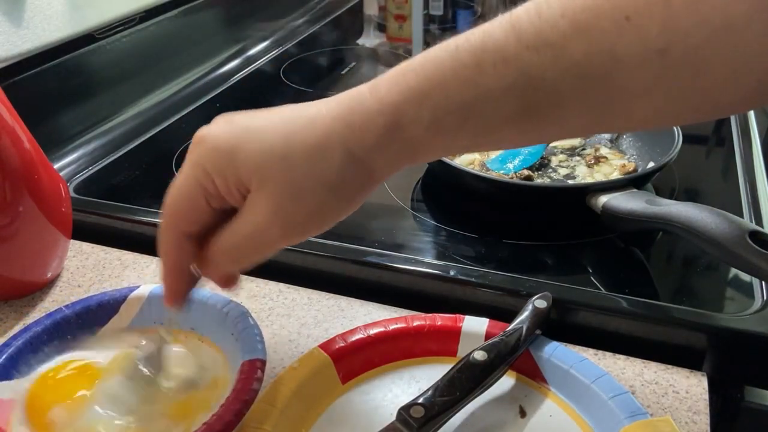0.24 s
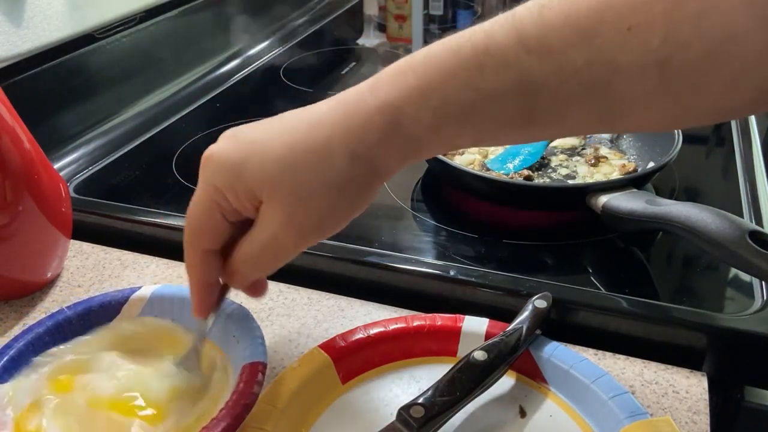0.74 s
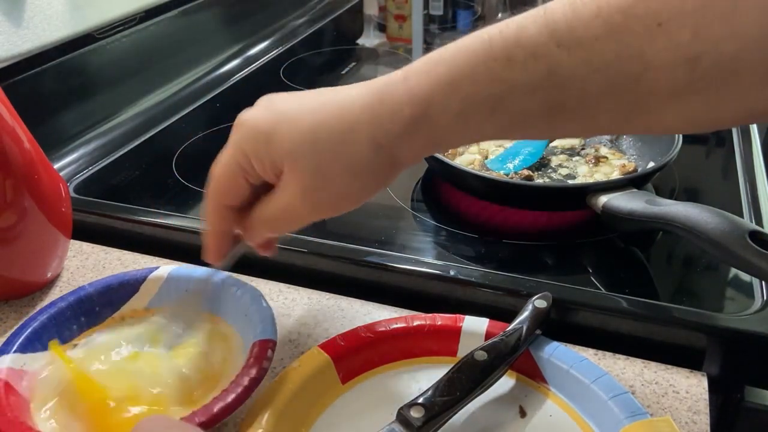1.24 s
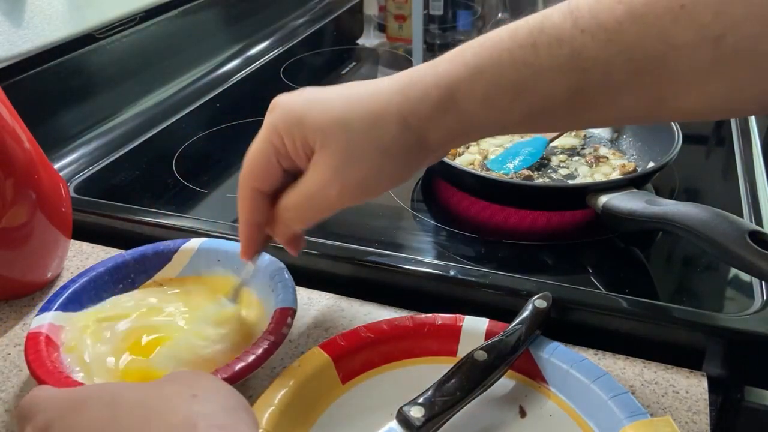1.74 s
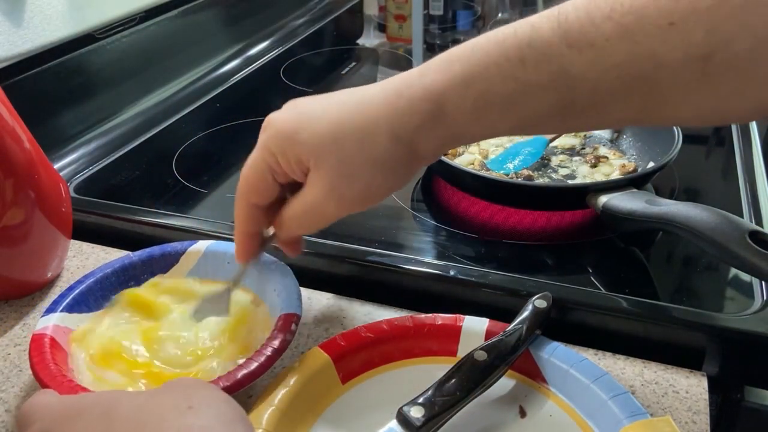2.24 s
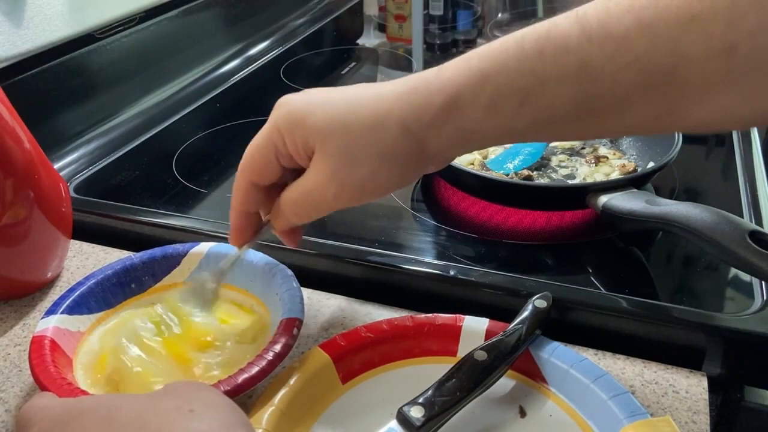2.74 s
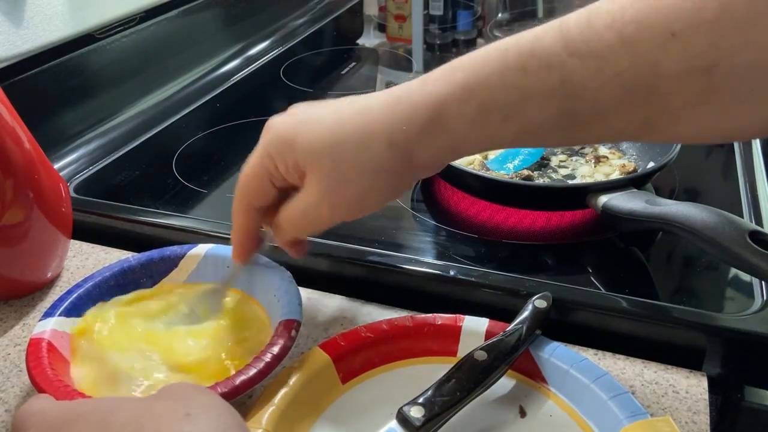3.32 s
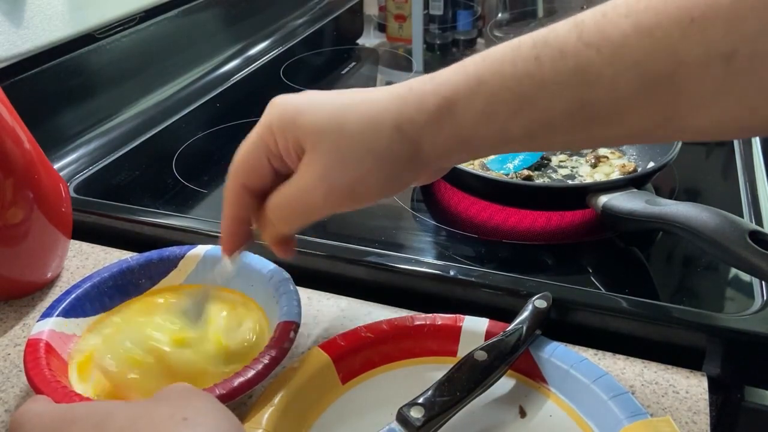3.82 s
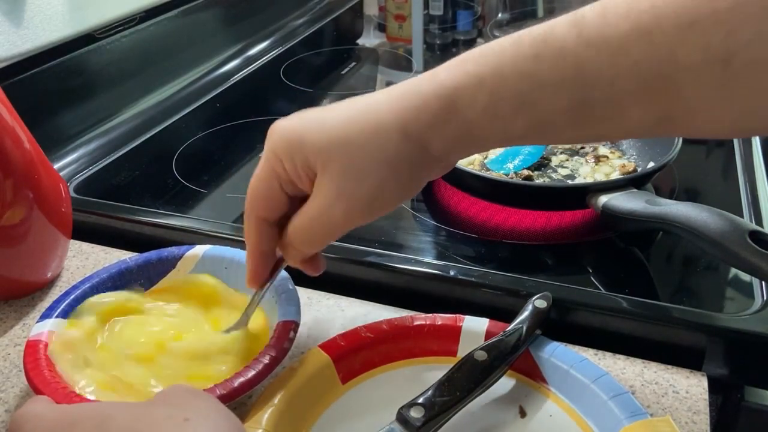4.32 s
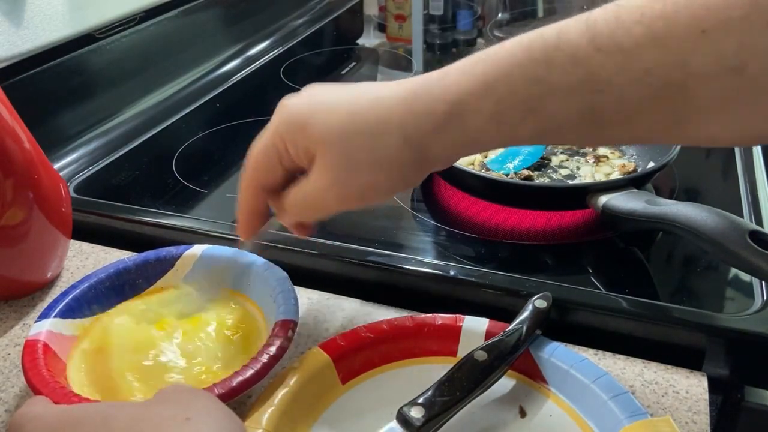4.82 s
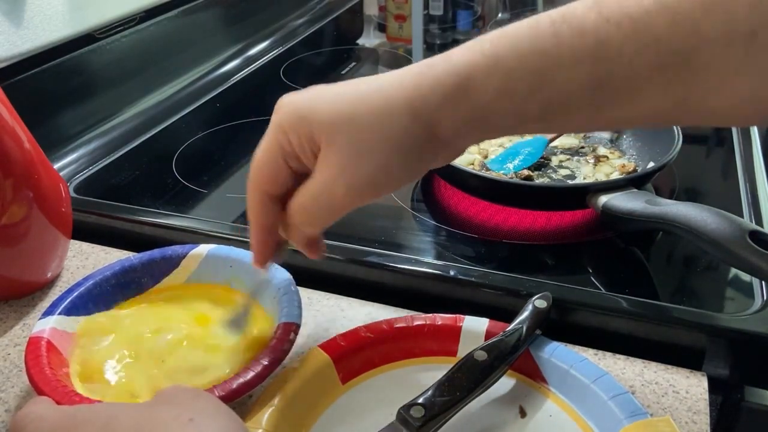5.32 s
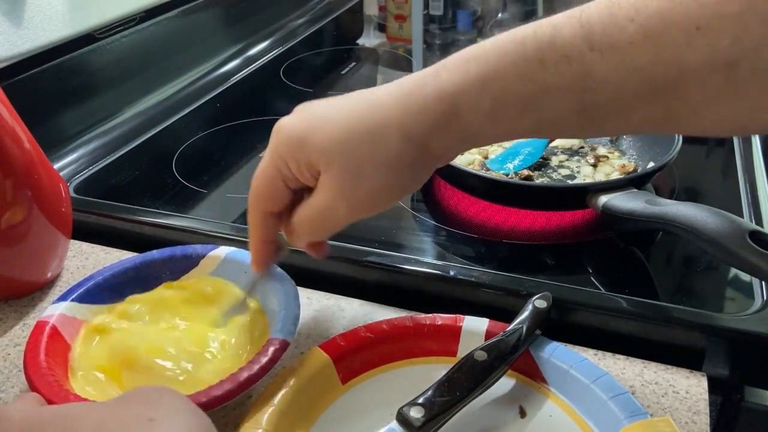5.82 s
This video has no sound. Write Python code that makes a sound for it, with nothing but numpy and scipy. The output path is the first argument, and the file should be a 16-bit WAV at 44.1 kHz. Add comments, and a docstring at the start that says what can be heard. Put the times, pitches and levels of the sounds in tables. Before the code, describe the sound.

Quick rhythmic fork taps and scrapes whisk wet egg in a paper bowl, starting soft, growing firm, then easing off, heard close.

```python
"""A soft scrape and a tap over faint noise, then a fork beats eggs in a paper bowl on a kitchen counter.
Taps and gritty drags ring the modes of the bowl wall; egg slaps and spits as bursts of banded crackle.
The bowl thumps, and slides once early on, by rubbing its base; the counter top adds low thuds.
A close phone picks it up with short room echoes, on the left channel only."""
import sys
import numpy as np
from scipy import signal
from scipy.fft import rfft, irfft, next_fast_len
from scipy.io import wavfile
from scipy.ndimage import uniform_filter1d

SR = 44100
rng = np.random.default_rng(int(sys.argv[2]) if len(sys.argv) > 2 else 0)


def wav_out(sig):
    """Save sig, one row per channel (or a flat mono array), as 16-bit PCM at SR to the path in sys.argv[1]."""
    wavfile.write(sys.argv[1], SR, np.round(np.clip(np.atleast_2d(sig).T, -1, 1) * 32767).astype(np.int16))


N = 267687

# Taps and faint onsets just ahead of some of them, each with a scrape. Each row: time in seconds,
# peak level in dB, pitch of the spot struck in Hz, pitch spread as a share, scrape level in dB,
# scrape fall in seconds.
TAP_ROWS = [(0.162, -36, 1417, 0.24, -52, 0.061), (.469, -47.5, 920, 0.057, -62.5, 0.025),
            (0.544, -57, 1614, 0.12, -54, 0.063), (0.568, -53, 1550, 0.088, -69, .015),
            (.594, -41.5, 1826, 0.071, -63.5, 0.022), (0.871, -72, 1630, 0.035, -78, 0.085),
            (0.927, -37, 1667, 0.094, -38, 0.019), (1.115, -39.5, 1730, 0.082, -56, 0.031),
            (1.263, -54, 1540, 0.066, -63, 0.015), (1.277, -33, 1490, 0.064, -41.5, 0.056),
            (1.298, -24.5, 1260, 0.48, -47, 0.053), (1.321, -28, 1236, 0.65, -71, 0.02),
            (1.444, -54, 1414, 0.073, -63.5, 0.049), (1.512, -56, 850, 0.085, -60.5, 0.043),
            (1.662, -39, 1220, 0.047, -43, 0.0069), (1.829, -60, 1432, 0.05, -46, 0.025),
            (2.071, -49.5, 1564, 0.15, -46.5, 0.032), (2.247, -57, 1380, 0.099, -58.5, 0.04),
            (2.264, -30, 1485, 0.15, -42.5, 0.04), (2.318, -40.5, 1860, 0.23, -59, 0.014),
            (2.447, -31.5, 1410, 0.16, -50, 0.032), (2.63, -35.5, 1210, 0.097, -42.5, 0.0075),
            (2.646, -28, 1560, 0.33, -49.5, 0.055), (2.826, -28, 1410, 0.29, -43.5, 0.062),
            (2.837, -32, 1360, 0.56, -67, 0.012), (2.988, -69, 1370, 0.092, -54.5, 0.064),
            (3.009, -27, 1500, 0.33, -41.5, 0.044), (3.183, -40.5, 1500, 0.6, -46, 0.013),
            (3.196, -23, 1580, 0.4, -33, 0.0085), (3.344, -48, 1710, 0.36, -55.5, 0.022),
            (3.366, -19.5, 1430, 0.14, -34.5, 0.014), (3.381, -13.5, 1580, 0.4, -39, 0.012),
            (3.529, -42.5, 1470, 0.23, -61, 0.037), (3.573, -28, 1475, 0.37, -32, 0.012),
            (3.729, -41, 1076, 0.14, -47, 0.016), (3.757, -25, 1460, 0.35, -41.5, 0.012),
            (3.938, -36.5, 1170, 0.48, -43, 0.011), (3.951, -53, 1390, 0.28, -33.5, 0.0066),
            (3.997, -26, 1160, 0.42, -48, 0.01), (4.139, -24.5, 1540, 0.62, -37, 0.022),
            (4.276, -28, 905, 0.12, -44.5, 0.049), (4.32, -33, 1340, 0.62, -36.5, 0.019),
            (4.329, -15.5, 1360, 0.25, -37, 0.019), (4.375, -29, 1330, 0.43, -37.5, 0.036),
            (4.466, -43.5, 1450, 0.053, -49, 0.011), (4.52, -25, 1200, 0.8, -40.5, 0.0098),
            (4.709, -35.5, 1580, 0.17, -45, 0.051), (4.902, -61.5, 1400, 0.24, -51.5, 0.059),
            (5.088, -43, 1340, 0.63, -41.5, 0.058), (5.095, -34.5, 1430, 0.17, -65, 0.011),
            (5.127, -37, 884, 0.16, -50, 0.038), (5.241, -48.5, 1100, 0.19, -55.5, 0.072),
            (5.277, -26, 1410, 0.51, -42, 0.06), (5.428, -59, 1830, 0.39, -66, 0.028),
            (5.461, -41, 1550, 0.72, -43, 0.043), (5.478, -35, 1550, 0.33, -64, 0.0081),
            (5.499, -41, 1500, 0.35, -67, 0.01), (5.532, -40, 1410, 0.81, -40.5, 0.019),
            (5.536, -55, 776, 0.034, -64.5, 0.046), (5.667, -64, 1640, 0.49, -59.5, 0.022),
            (5.727, -44, 1520, 0.17, -58, 0.026), (5.871, -36, 1657, 0.16, -48, 0.07),
            (6.065, -44.5, 1460, 0.032, -39.5, 0.014)]
# Modes of the bowl wall. Each row: frequency in Hz, width in Hz, level in dB.
WALL_MODES = [(650, 122, 15), (751, 27, 6), (835, 55, 4.5), (916, 38, -7), (1037, 20, 6.5), (1190, 67, -2),
              (1257, 160, 3), (1333, 34, -1), (1372, 144, 1.5), (1561, 110, 3), (1602, 150, 1),
              (1880, 170, -4.5), (1861, 101, 5), (2320, 17, -4.5), (2760, 8.7, -5.5)]
# Modes of the fork tines. Each row: frequency in Hz, width in Hz, level in dB.
TINE_MODES = [(4600, 680, -1), (6340, 790, -2.5), (6340, 34, -4.5), (8210, 400, -2.5)]
FIRM_SPREAD = 0.28  # pitch spread of a firm contact, as a share
PATCH_DB = 3  # how much bands of fizz and spray trade strength between contacts


def undb(db):
    """dB to gain."""
    return 10 ** (np.asarray(db) / 20)


def band(x, hz, width_hz):
    """Resonance with gain 1 at its centre."""
    return signal.lfilter(*signal.iirpeak(min(hz, .45 * SR), hz / width_hz, fs=SR), x)


def ring(x, modes):
    """Sum of resonances, neighbours in opposite phase."""
    return sum((-1) ** k * undb(db) * band(x, hz, width) for k, (hz, width, db) in enumerate(modes))


def unit(x):
    """Scale to rms 1."""
    return x / np.sqrt(np.mean(x ** 2))


def steep_band(x, hz, width_hz):
    """The same resonance twice in series, at rms 1."""
    return unit(band(band(x, hz, width_hz), hz, width_hz))


def varied(modes, chance, shift, trade_db, max_width_hz=np.inf):
    """Modes whose pitches shift (as a share) and whose levels trade strength at random."""
    return [(hz * (1 + shift * r), min(width, max_width_hz), db + trade_db * q)
            for (hz, width, db), r, q in zip(modes, chance, chance[::-1])]


def grit(rough_db):
    """Dense slips of rms 1 whose sizes have a long but bounded tail."""
    sizes = undb(rough_db * np.minimum(rng.exponential(size=N), 5.0))
    return unit(rng.standard_normal(N) * sizes)


def clumps(rate_hz, depth_db):
    """Gain of rms 1 that wanders to a new value rate_hz times a second."""
    step = int(SR / rate_hz)
    levels = np.repeat(rng.standard_normal(N // step + 1), step)
    return unit(undb(depth_db * uniform_filter1d(levels, step)[:N]))


def fade(length, t60_s, rise_s):
    """Quick rise, then a fall of 60 dB in t60_s."""
    t = np.arange(length) / SR
    return (1 - np.exp(-t / rise_s)) * 10 ** (-3 * t / max(t60_s, .01))


def add(out, s, piece):
    """Mix a piece in at time s."""
    i = int(s * SR)
    out[i:i + len(piece)] += piece[:len(out) - i]


def window(x, s, length):
    """The stretch of a noise that starts at time s, wrapping at the end."""
    return np.take(x, int(s * SR) + np.arange(length), mode="wrap")


def kitchen(level_db=-76.5, waver_db=3.5):
    """Faint noise, swelling and dipping, whose third-octave bands each waver slowly."""
    # Background spectrum. Each row: frequency in Hz, relative level in dB per Hz.
    spectrum = [(12, -15.5), (20, -1), (33, -12), (55, -24), (204, -23), (923, -26), (1000, -31.5),
                (3630, -29.5), (5230, -28.5), (8650, -26), (9400, -33), (13500, -25), (15400, -31.5)]
    # Background swells and dips. Each row: time in seconds, gain in dB.
    swell_rows = [(0, 1), (.55, -6), (.86, -6.5), (1.0, -1), (1.598, 0.3), (2.05, -3.5), (2.6, -0.5),
                  (3.5, 1), (4.1, 1), (4.8, 1), (5.2, -1), (5.6, -1), (6.07, 1.5)]
    hz, db = np.transpose(spectrum)
    size = next_fast_len(N)
    octaves = np.log2(np.fft.rfftfreq(size, 1 / SR) + 1)
    noise = rfft(rng.standard_normal(size)) * undb(np.interp(octaves, np.log2(hz), db))
    out, step = np.zeros(N), SR // 12
    place, knots = np.arange(N) / step, N // step + 2
    for octave in np.arange(9, 44) / 3:
        share = np.clip(1 - 3 * np.abs(octaves - octave), 0, 1)
        walk = np.interp(place, np.arange(knots), undb(waver_db * rng.standard_normal(knots)))
        out += irfft(noise * share, size)[:N] * walk
    swell_db = np.interp(np.arange(N) / SR, *np.transpose(swell_rows))
    return undb(level_db + swell_db) * unit(out)


def room(x, level_db=-13, t60_s=0.18, treble_t60_s=0.19):
    """Diffuse echoes of the kitchen walls: decaying noise with its own rise and fall below and above 3 kHz."""
    length = SR // 2
    noise = rng.standard_normal(length)
    low = signal.sosfilt(signal.butter(2, 3000, fs=SR, output="sos"), noise)
    echo = low * fade(length, t60_s, 0.0051) + (noise - low) * fade(length, treble_t60_s, 0.0066)
    return undb(level_db) * signal.fftconvolve(x, echo / np.linalg.norm(echo))[:N]


def bump(t, s, width_s):
    """Gaussian swell around time s."""
    return np.exp(-((t - s) / width_s) ** 2)


def thumps(rub, t60_s=0.31, crest_db=5, blow_db=6, lag_s=0.004):
    """Each thump lands the base on the counter with a blow, then rubs it, ringing the base modes."""
    # Bowl pressed on the counter. Each row: time in seconds, nominal peak level in dB.
    presses = [(0.925, -62), (1.115, -74.5), (2.077, -60), (2.264, -57), (2.449, -57.5), (2.649, -56.5),
               (2.823, -40.5), (3.009, -42), (3.19, -42), (3.377, -41.5), (3.571, -41.5), (3.754, -42.5),
               (3.944, -43.5), (3.991, -50.5), (4.131, -41), (4.324, -39.5), (4.509, -42.5), (4.707, -53),
               (4.909, -64), (5.099, -51.5), (5.278, -69.5), (5.531, -62.5), (5.869, -70.5)]
    # Modes of the bowl base. Each row: frequency in Hz, width in Hz, level in dB.
    base_modes = [(330, 36, 8.5), (369, 24.8, 8.5), (438.5, 55, -1), (565, 88, 6.5), (674, 120, -3.5)]
    hold_s, lift_s, tail_db = 0.047, 0.0098, -3  # the force drops by tail_db as the fork's weight lifts
    out, length = np.zeros(N), SR // 3
    blow = undb(blow_db) * np.hanning(SR // 1000)
    held = undb(tail_db * np.clip((np.arange(length) / SR - hold_s) / lift_s, 0, 1))
    push = fade(length, t60_s, 0.00038) * held
    small = signal.butter(3, 275, "high", fs=SR, output="sos")  # a small base radiates little bass
    for (s, db), chance in zip(presses, rng.standard_normal((len(presses), len(base_modes)))):
        force = push * window(rub, s, length)
        force[:len(blow)] += blow
        # mode pitches and levels vary at random between thumps
        knock = signal.sosfilt(small, ring(force, varied(base_modes, chance, 0.03, 3.5)))
        knock = knock - (1 - held) * band(knock, 350, 140)  # lift weakens the lowest modes most
        add(out, s + lag_s, undb(db - crest_db) * knock * np.linalg.norm(push) / np.linalg.norm(knock))
    return out


def counter():
    """Thumps and the slide rub the base on the counter; the counter top gives with low thuds."""
    # Bowl sliding on the counter. Each row: time in seconds, level in dB.
    slide_rows = [(.32, -90), (0.359, -57), (0.388, -51.5), (.43, -62.5), (.48, -66), (.52, -71),
                  (.7, -70.5), (.8, -77.5), (0.841, -101)]
    # Modes of the sliding base. Each row: frequency in Hz, width in Hz, level in dB.
    sliding_modes = [(279, 56, -7.5), (329, 46, -8), (479, 16, -23)]
    # Counter top giving under the fork's weight. Each row: deepest time in seconds, level in dB.
    jolts = [(.94, -78), (1.126, -74.5), (2.458, -72.5), (2.658, -72), (2.85, -72), (2.9, -68.5),
             (3.04, -68), (3.2, -70), (3.269, -63), (3.39, -66.5), (3.59, -62.5), (3.64, -66), (3.775, -66),
             (3.829, -67.5), (3.96, -65.5), (4.016, -63.5), (4.16, -71), (4.341, -60.5), (4.727, -64),
             (5.12, -68.5), (5.2, -73), (5.308, -72), (5.491, -75), (5.559, -76.5)]
    # Modes of the counter top. Each row: frequency in Hz, width in Hz, level in dB.
    deep_modes = [(41.4, 32, -25), (97, 89, -10), (115.5, 26.4, 3.5), (162.3, 140, -8.5)]
    rub, t = grit(2.06), np.arange(N) / SR
    base = thumps(rub)
    slide = undb(np.interp(t, *np.transpose(slide_rows), left=-140, right=-140))
    # the rim rings as the bowl starts to slide
    catch = undb(-59) * bump(t, 0.387, 0.024) * steep_band(rub, 685, 110)
    weight = sum(undb(db) * bump(t, s, 0.028) for s, db in jolts)
    weight = weight + undb(-61) * bump(t, 0.448, 0.076)  # one swell as the bowl settles
    deep = ring(weight * rub, deep_modes) / np.std(ring(rub, deep_modes))
    return base + deep + catch + ring(slide * rub, sliding_modes) / np.std(ring(rub, sliding_modes))


def splats(tines_db=-4, broad_db=-15, crest_db=8, trade_db=0.5, top_lasts=0.5):
    """Egg slaps as bursts of crackle, each brightest in its own band; tines and top octave join in."""
    # Egg slapping and spitting off the tines. Each row: time in seconds, nominal peak level in dB,
    # brightest band in Hz, level above 10 kHz in dB against the peak level.
    slaps = [(0.149, -52, 5130, -39), (.49, -60, 5000, 2), (0.546, -60, 5370, -20), (0.93, -53, 5270, -36),
             (1.0935, -47.5, 5030, -33), (1.111, -53, 4560, -23), (1.277, -43, 9070, -32),
             (1.301, -35.5, 4800, -10), (1.659, -32, 5550, -13), (1.838, -51, 10500, 3),
             (1.904, -56.5, 8600, -25), (2.154, -51, 6150, -36), (2.252, -49, 4180, -4),
             (2.447, -53, 5740, -3), (2.559, -54, 8300, 2), (2.635, -50.5, 4620, -28),
             (2.827, -48, 5330, -18), (2.976, -49.5, 5840, 7), (3.007, -41, 3460, -40),
             (3.345, -45.5, 3200, -2), (3.365, -35, 5520, -19), (3.53, -40, 3460, -33),
             (3.555, -40.5, 8560, -9), (3.934, -35.5, 4370, -1.5), (4.134, -28.5, 6080, -6),
             (4.22, -56, 8900, 8), (4.319, -46, 9400, -4), (4.328, -36, 4390, -8), (4.372, -40, 6100, -26),
             (4.511, -30, 4600, 10.5), (4.652, -51.5, 5540, -28), (4.686, -48.5, 5470, 5),
             (4.707, -39.5, 5360, -22), (4.789, -52, 6200, 3), (4.945, -52, 8800, 10),
             (5.084, -50, 6300, 5.5), (5.265, -35.5, 5470, -30), (5.273, -40.5, 8700, -21),
             (5.465, -43.5, 4500, -9), (5.532, -54.5, 4400, -24), (5.87, -57, 4600, -14),
             (5.9, -61, 8000, -1), (5.95, -53.5, 5700, -22), (6.053, -48, 4650, -9),
             (6.052, -41.5, 14600, -12), (6.064, -30, 4560, -16)]
    # Patches of fine fizz, each flickering alone. Each row: frequency in Hz, level in dB.
    top_rows = [(10900, -3), (12800, -2.5), (14700, -0.5)]
    # loud splats are short, soft ones fizz on: t60 at fizz_db, and the rise in dB that halves it
    fizz_db, fizz_t60_s, halving_db = -47, 0.21, 24.5
    fizz_rise = 0.034  # as a share of t60
    spray, length = grit(1.3) * clumps(40, 5.7), SR // 4
    patches = [undb(db) * clumps(35, 4.0) * steep_band(grit(2.5), hz, 2000) for hz, db in top_rows]
    broad = unit(band(spray, 6100, 15000))
    out, t = np.zeros(N), np.arange(length) / SR
    for (s, db, hz, top_db), chance in zip(slaps, rng.standard_normal((len(slaps), len(TINE_MODES)))):
        t60_s = fizz_t60_s * 2 ** ((fizz_db - db) / halving_db)
        crackle = window(spray, s, length)
        own = steep_band(crackle, hz, 0.11 * hz)
        # tine pitches and levels vary at random between splats
        tines = unit(ring(crackle, varied(TINE_MODES, chance, 0.045, trade_db)))
        mix = own + undb(tines_db) * tines + undb(broad_db) * window(broad, s, length)
        # a snap on top of a slower wet fizz
        snap = fade(length, 0.018, 0.00099) * min(undb(db - fizz_db + 4.5), 1.5)
        fizz = .5 * fade(length, t60_s, fizz_rise * t60_s)
        top = unit(sum(undb(PATCH_DB * q) * window(patch, s, length) for patch, q in zip(patches, chance)))
        top_snap = snap * (1 - fade(length, 0.03, 1e-4))
        top_fizz = 0.48 * fade(length, 1.13 * t60_s, 2 * fizz_rise * t60_s)
        top_fizz = top_fizz * np.exp(-(t / (top_lasts * t60_s)) ** 4)
        fine = undb(top_db) * top * (top_snap + top_fizz)
        add(out, s, undb(db - crest_db) * (mix * (snap + fizz) + fine))
    return out


def wall(force, hz, spread, chance, moved=0, waver=None, skirt_db=-18, upper_db=-18):
    """The wet wall rings most in modes near the spot touched; its higher modes always ring a little."""
    spread = max(spread, .04)
    tone, upper = 0, 0
    for k, (r, q, (f, w, d)) in enumerate(zip(chance, chance[::-1], WALL_MODES)):
        # each mode swells and dips at its own moments
        drive = force if waver is None else force * np.roll(waver, 700 * k)
        near = np.exp(-((np.log(f / hz) - moved) / spread) ** 2) + undb(skirt_db)
        gain, f = undb(d + 1.2 * q), f * (1 + 0.022 * r)
        tone = tone + gain * band(near * drive, f, w)
        if f > 1.35 * hz:
            upper = upper + gain * band(drive, f, w)
    tone = band(tone, hz, 1.34 * spread * hz) + undb(upper_db) * min(spread / FIRM_SPREAD, 1) * upper
    return signal.sosfilt(signal.butter(3, [0.6 * hz, 3300], "band", fs=SR, output="sos"), tone)


def contacts():
    """Every scrape and drag as (s, dB, Hz, spread, rise s, fall s, silent until s from its peak)."""
    # Fork dragged through the egg over the bowl between taps. Each row: loudest time in seconds,
    # level in dB, pitch in Hz, rise plus fall in seconds.
    drag_rows = [(0.031, -52, 1487, 0.053), (0.333, -64, 1485, 0.019), (0.395, -55.5, 1480, 0.051),
                 (0.51, -60, 953, 0.037), (0.594, -60, 1600, 0.028), (0.737, -68, 1527, 0.029),
                 (0.787, -60, 1726, 0.041), (0.969, -50.5, 1820, 0.033), (1.168, -53.5, 1620, 0.042),
                 (1.505, -50, 1590, 0.014), (1.538, -50.5, 1660, 0.023), (1.7, -47.5, 1470, 0.03),
                 (2.142, -49, 1430, 0.039), (2.512, -44, 1476, 0.05), (2.705, -49, 1430, 0.033),
                 (2.897, -43.5, 1193, 0.045), (3.089, -39, 1250, 0.029), (3.259, -39.5, 1340, 0.053),
                 (3.455, -37, 1345, 0.047), (3.636, -38, 1157, 0.053), (3.824, -40, 1210, 0.053),
                 (4.006, -43.5, 1076, 0.048), (4.105, -65.5, 1240, 0.18), (4.147, -47, 2460, 0.0082),
                 (4.209, -39.5, 1340, 0.033), (4.53, -50, 2800, 0.027), (4.575, -42, 1440, 0.057),
                 (4.669, -65.5, 800, 0.2), (4.77, -64.5, 2670, 0.075), (4.959, -54.5, 1690, 0.049),
                 (5.145, -41.5, 1440, 0.035), (5.15, -58.5, 2510, 0.014), (5.693, -58.5, 1560, 0.024),
                 (5.741, -50, 1335, 0.041), (5.921, -73, 2720, 0.18), (5.932, -46.5, 1400, 0.032)]
    peak_s, scrape_rise_s = 0.00053, 0.0034  # a scrape is loudest peak_s after its row's time
    rise_share = 0.49  # of a drag's length
    firm_db, spread_per_db = -42.5, .008  # a harder drag stirs more of the wall's modes
    scrapes = [(s + peak_s, db, hz, spread, scrape_rise_s, fall, -peak_s)
               for s, _, hz, spread, db, fall in TAP_ROWS]
    return scrapes + [(s, db, hz, FIRM_SPREAD + spread_per_db * (db - firm_db), rise_share * long,
                       (1 - rise_share) * long, -np.inf) for s, db, hz, long in drag_rows]


def drags(rise_shape=1.0, fall_shape=1.94, spray_fall=1.27):
    """Gritty slips swell and die away in the wall; a fine spray swells with them and lasts longer."""
    # Egg spitting off the moving fork. Each row: time in seconds, level in dB against the scrape or drag,
    # brightest band in Hz.
    spray_rows = [(0, -23, 4900), (.6, -23, 5500), (1.2, -32.5, 3960), (1.55, -22, 4860),
                  (1.678, -5.5, 8730), (1.852, -53, 7640), (2.2, -21.5, 5800), (2.88, -30, 5700),
                  (3.08, -27.5, 3800), (3.26, -31, 5750), (3.45, -32, 4200), (3.8, -36, 4080),
                  (3.97, -16.5, 6100), (4.2, -28, 4970), (4.55, -18.5, 5870), (4.952, -22, 5800),
                  (5.15, -29.5, 4660), (6.07, -37.5, 4840)]
    spray_width, spray_scatter = .16, .1  # shares of the band: width, scatter between contacts
    sag_per_s = 2.5  # the spot touched sinks in pitch as the fork moves down, log share per second
    out, length, lead = np.zeros(N), SR // 4, SR // 12
    slips, mist = grit(2.13) * clumps(150, 2.95), grit(2.0) * clumps(120, 3.34)
    tines = [undb(db) * band(mist, hz, width) for hz, width, db in TINE_MODES]
    tines = tines + [undb(-23.5) * band(mist, 9300, 7200)]
    t = (np.arange(length) - lead) / SR
    moved = -sag_per_s * np.clip(t, -.04, .06)
    waver = clumps(50, 7)  # random swelling and dipping of each drag
    rows, (when, spits_db, spits_hz) = contacts(), np.transpose(spray_rows)
    for row, chance in zip(rows, rng.standard_normal((len(rows), len(WALL_MODES)))):
        s, db, hz, spread, rise, fall, start = row
        spray_db = np.interp(s, when, spits_db)
        spray_hz = np.interp(s, when, spits_hz) * np.exp(spray_scatter * chance[0])
        # rise and fall are the times to 8 dB below the peak
        late = np.abs(t) / np.where(t < 0, max(rise, .002), max(fall, .002))
        swell = undb(-8 * late ** np.where(t < 0, rise_shape, fall_shape)) * (t >= start)
        force = window(slips, s, length) * swell
        tone = wall(force, hz, spread, chance, moved, window(waver, s, length))
        tone = tone * np.linalg.norm(swell) / np.linalg.norm(tone)
        own = steep_band(window(mist, s, length), spray_hz, spray_width * spray_hz)
        spray = unit(sum(undb(PATCH_DB * q) * window(tine, s, length) for tine, q in zip(tines, chance[1:])))
        spray_swell = undb(spray_db - 8 * late / np.where(t < 0, 1, spray_fall))
        wash = (own + undb(-2.0) * spray) * spray_swell
        skip = max(lead - int(s * SR), 0)
        add(out, max(s - lead / SR, 0), undb(db) * (tone + wash)[skip:])
    return out


def taps(rattle_db=-20, t60_s=0.031, tick_db=-22):
    """A short push and a brief rattle ring the wall; the tines tick sharply."""
    push_cycles = 0.32  # cycles that a blow lasts, divided by the spread of its pitch
    out, slips, length = np.zeros(N), grit(1.8), SR // 8
    chances = rng.standard_normal((len(TAP_ROWS), len(WALL_MODES)))
    for (s, db, hz, spread, _, _), chance in zip(TAP_ROWS, chances):
        force = undb(rattle_db) * window(slips, s, length) * fade(length, t60_s, 0.004)
        size = int(SR / hz * np.clip(push_cycles / max(spread, .04), 1.6, 3.5))
        # the egg cushions the blow
        cycles = np.cos(2 * np.pi * hz / SR * (np.arange(size) - size / 2))
        force[:size] += np.hanning(size) * cycles * 2 / np.sqrt(16 * size)
        tone = wall(force, hz, spread, chance)
        add(out, s - size / 2 / SR, undb(db) * tone / np.max(np.abs(tone[:SR // 100])))
        struck = varied(TINE_MODES, chance, 0.065, 3.9, max_width_hz=350)
        tick = ring(signal.unit_impulse(SR // 40), struck)
        tick_gain = undb(db + tick_db) * min(spread / FIRM_SPREAD, 1)
        add(out, s, tick_gain * tick / np.max(np.abs(tick)))
    return out


def scene():
    """All sources, on the left channel only; source levels are those of the two-channel mean."""
    near = taps() + drags() + splats() + counter()
    return np.array([2 * (near + room(near) + kitchen()), np.zeros(N)])


def record(dry):
    """The phone thins the deepest bass, adds its converter's small standing offset and cuts the top."""
    thin = signal.sosfilt(signal.butter(2, 40, "high", fs=SR, output="sos"), dry) + [[-0.00013], [0]]
    return signal.sosfilt(signal.ellip(10, .2, 80, 15500, fs=SR, output="sos"), thin)


dry = scene()
out = record(dry)
wav_out(out)
```